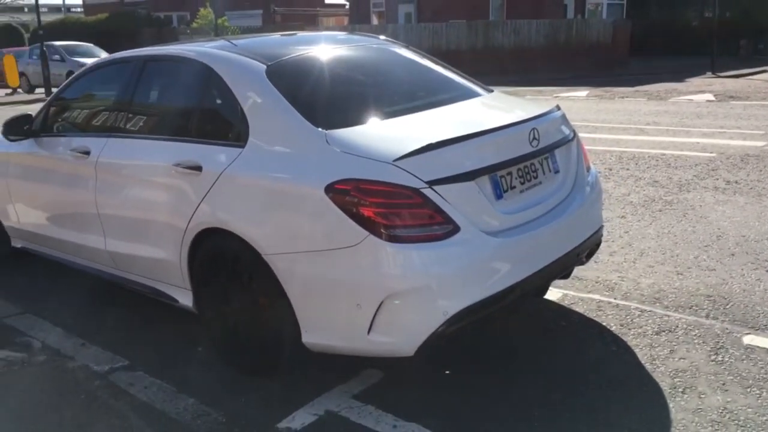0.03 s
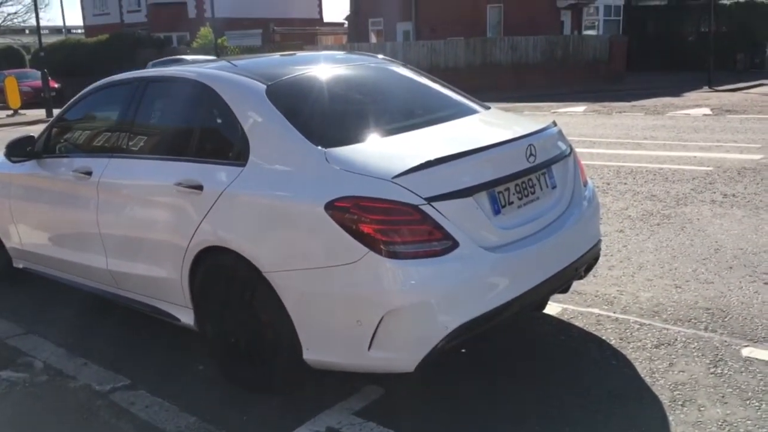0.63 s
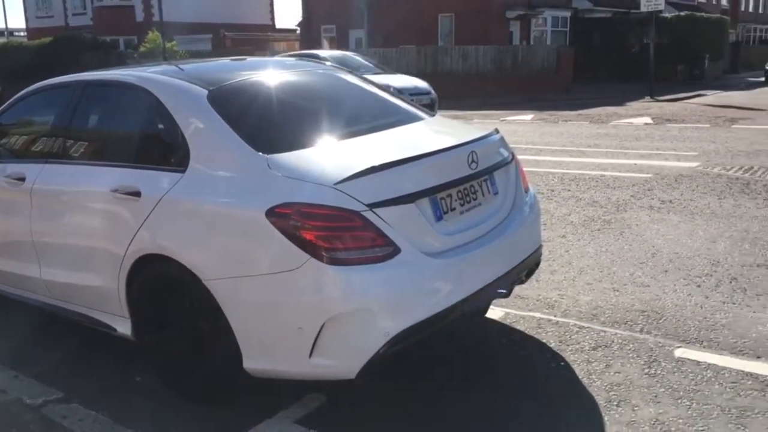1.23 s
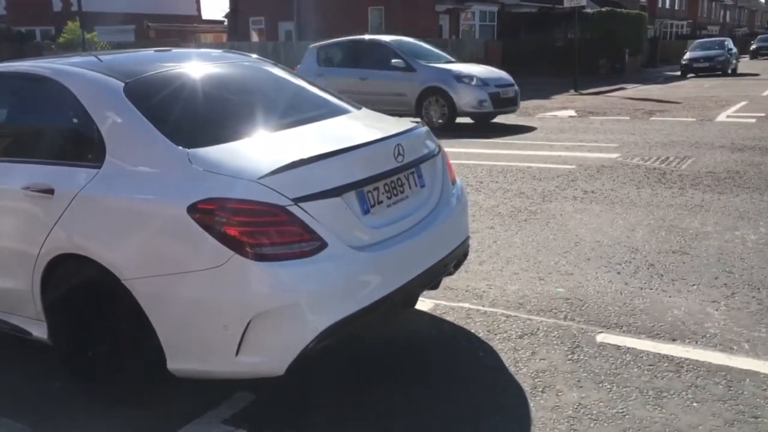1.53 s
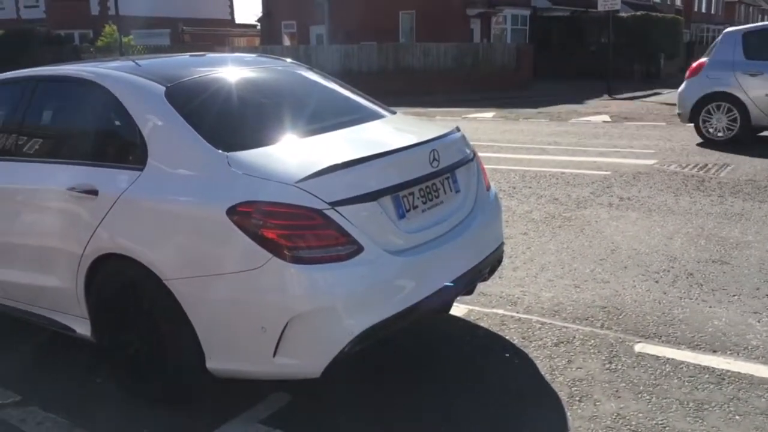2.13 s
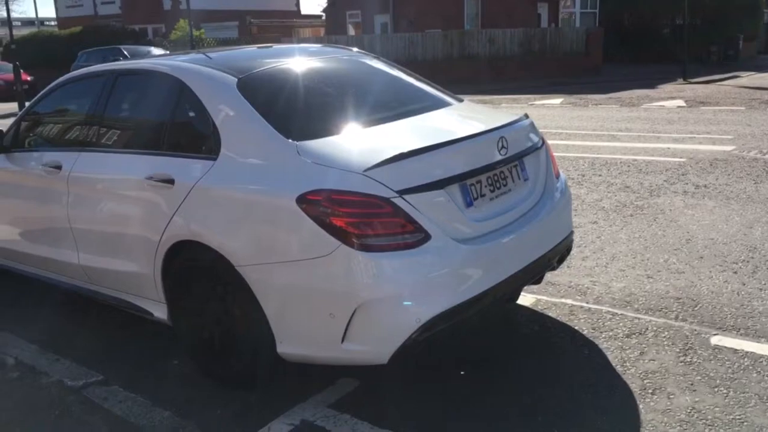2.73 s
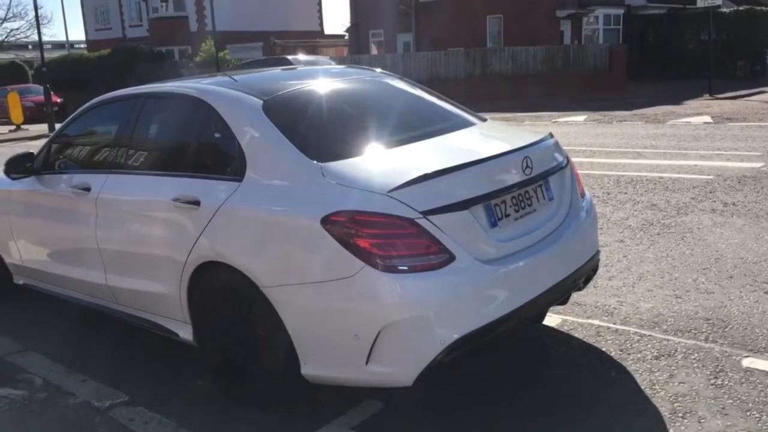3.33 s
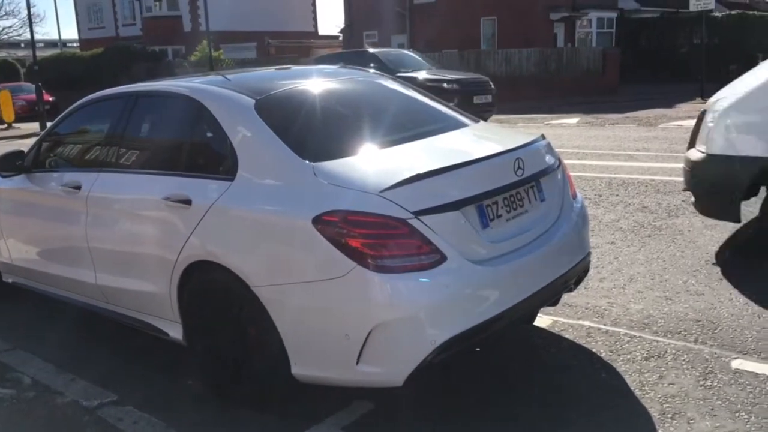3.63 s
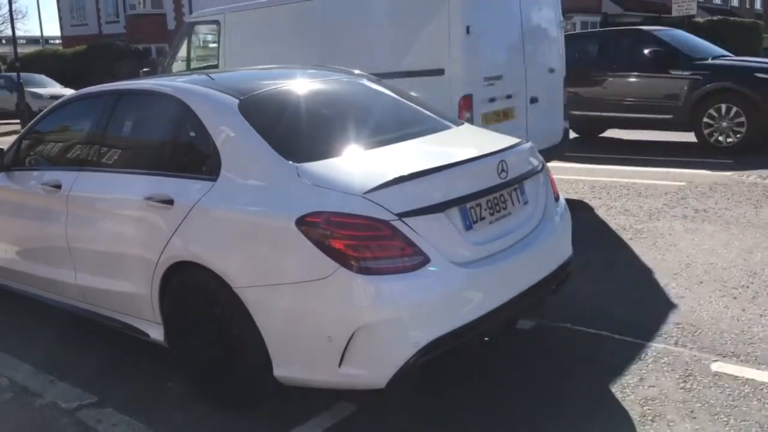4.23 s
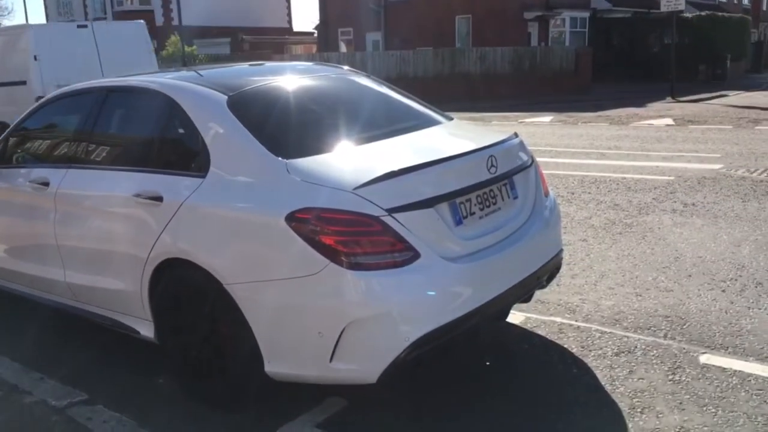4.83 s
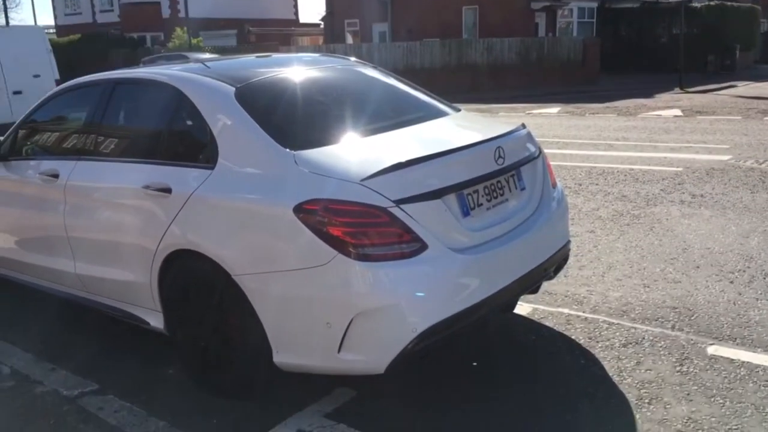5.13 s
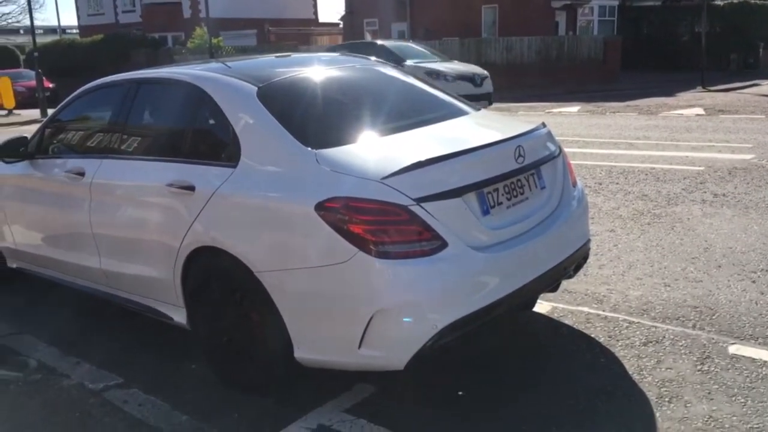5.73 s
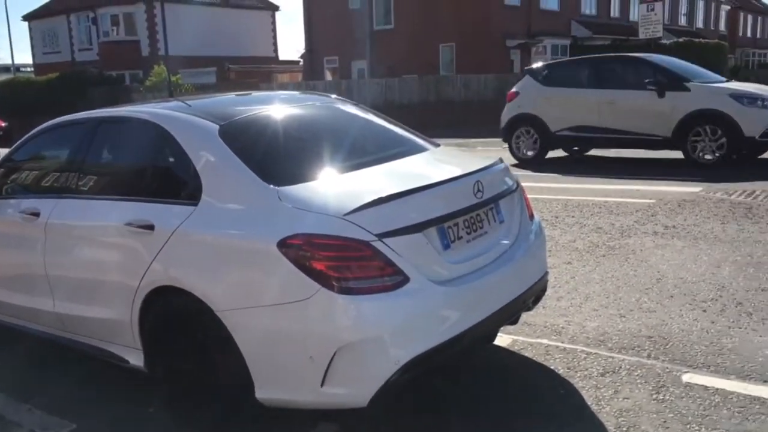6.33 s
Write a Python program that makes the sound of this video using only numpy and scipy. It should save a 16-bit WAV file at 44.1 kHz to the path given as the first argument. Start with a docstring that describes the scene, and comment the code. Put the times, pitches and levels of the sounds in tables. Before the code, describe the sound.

A V8 car stands at the kerb, heard from close behind its tailpipes. It revs at once, booming and rasping up to a peak at about 0.5 seconds, where the exhaust sputters and pops. The pitch then sinks to a low, burbling idle by 2.3 seconds. At 3 seconds a second rev climbs in three stabs, starting with a brief rattle of loose metal and a tiny high squeak. It peaks near 4 seconds with a quick cluster of sharp cracks, then winds down. A third, lower rev rises at 5.5 seconds, pops lightly near 5.9 and stays raised until the end at about 6.4. Very faint turbo whistles fall in pitch after each rev. Further off, cars and a van pass with soft swells of tyre noise around 0.5, 2, 3.6 and 6.2 seconds, over dull distant traffic.

```python
"""At the kerb of a street, one microphone behind the tailpipes of a standing turbocharged V8.
The engine is revved three times. Its orders boom through the silencers and each firing sends a rasp
of gas out of the pipes; at lift-off the exhaust sputters and unburnt fuel cracks, then the turbos
whistle faintly as they spin down. A loose exhaust part chatters as the second rev begins.
Further off, cars and a van roll past over a dull bed of distant traffic."""
import sys
import numpy as np
from scipy import signal
from scipy.io import wavfile
from scipy.ndimage import uniform_filter1d, minimum_filter1d, map_coordinates

SR = 44100
rng = np.random.default_rng(int(sys.argv[2]) if len(sys.argv) > 2 else 0)


def generate_wav(signal):
    """Clip the signal to [-1, 1] and save it as 16-bit WAV at the path in sys.argv[1]."""
    frames = np.transpose(np.atleast_2d(signal))
    scaled = np.clip(frames, -1, 1) * 32767
    pcm = np.round(scaled).astype(np.int16)
    wavfile.write(sys.argv[1], SR, pcm)


N = 282240
TIME = np.arange(N) / SR
BINS = np.fft.rfftfreq(8192, 1 / SR)

# tyre roar as it reaches the kerb: frequency_hz, gain_db
TYRE_SPECTRUM = [(25,-13),(60,12),(200,6.5),(400,-6.5),(600,-3.5),(1000,-2),(1600,-8),(2800,-13),(4000,-19),(4900,-24.5),(6200,-24.5),(8500,-31.5),(10500,-35.5),(15500,-38.5)]
# vehicles rolling past the microphone: nearest_s, half_length_s, level_db
PASS_BYS = [(0.43,0.35,-26),(2.123,0.29,-30),(3.592,0.19,-24.5),(6.2,0.5,-26.5)]
# their engine hum and gear whine: nearest_s, half_length_s, pitch_hz, level_db
PASSING_TONES = [(2.1,.14,340,-40),(2.08,.18,1470,-41.5),(2.75,.3,365,-42),(4.35,.4,43,-37)]
# turbos spinning down after each rev: start_s, end_s, first_pitch_hz, fall_hz_per_s, level_db
SPIN_DOWNS = [(.7,2.95,15780,3380,-70),(4.15,5.55,15680,3520,-74),(5.8,6.45,12050,1900,-71)]
# whistles within one spin-down: pitch_ratio, gain_db
WHISTLES = [(1, 3), (1.11, -1), (1.22, -3), (1.32, -4)]
# engine speed in four-stroke cycles a second: time_s, cycle_hz
ENGINE_SPEED = [(.07,20.3),(.2,37),(.4,45),(.48,46.3),(.8,40.3),(1.2,30.5),(1.8,16.7),(2.27,11.5),(2.7,10.25),
                (2.93,11),(3.38,28.4),(3.68,33.6),(3.8,45),(3.93,48.1),(4.01,43.7),(4.4,35.7),(4.76,31.5),(5.13,24.4),
                (5.48,22.5),(5.71,35.7),(5.9,33.1),(6.4,32.3)]
# throttle stabs, loads 0-1: start_s, rise_s, lift_off_s, full_load, load_left, fade_s, sputter_db, dip_db
THROTTLE_STABS = [(.01,0.2,.53,0.96,0.74,0.62,-2,-7), (2.95,0.074,3.10,0.75,0.49,1.1,-11,-4.5),
                  (3.22,0.073,3.37,.82,0.65,5.6,-11,-1), (3.62,0.11,4.0,1,0.64,0.21,-2.5,-5.5),
                  (4.85,.3,4.9,0.14,0.33,1.65,-5,-1.5), (5.41,0.33,5.865,0.95,0.46,1.56,-6,-6)]
# ring of the loose exhaust part: frequency_hz, gain_db
LOOSE_METAL = [(500,-3.5),(850,4.5),(1150,2.5),(1550,-5),(1900,-1),(2150,-2.5),(2350,-41),(4000,-30),(9000,-39)]
# broad colour of the exhaust rasp: frequency_hz, gain_db
RASP_SPECTRUM = [(150,-23.5),(400,-15.5),(490,-3.5),(700,-4.5),(830,2),(1030,1.5),(1600,-6),(2700,-12),(3200,-15.5),(4300,-23.5),(4900,-27),(6200,-25),(7500,-34.5),(9300,-30.5),(10500,-40.5),(15500,-37)]
# resonances of the pipe ends: centre_hz, width_hz, lift_db
PIPE_RESONANCES = [(530,25,4.5),(914,140,1),(1325,42,8),(1950,220,2.5),(2744,440,8.5),(3570,140,6),(4140,370,8.5)]
# unburnt fuel cracking in the pipes: time_s, peak_db, decay_s, tilt_db_per_octave
FUEL_CRACKS = [(.5194,-12,.003,0),(3.9765,-4,.005,-3),(3.9914,-1.5,.005,9),(4.0134,-13,.003,4),(5.8494,-14,.004,0)]
# multiples of the cycle rate that drone in the pipes: order, gain_db
DRONE_ORDERS = [(14, -8), (15, -3), (16, 0), (19, -8), (21, -8), (24, -9)]
# the low note; 8 is the firing rate, 3 and 5 the burble of the uneven banks: order, coast_db, load_db
ENGINE_ORDERS = [(1,-38,-38),(2,-11,-16),(3,0.5,-2),(4,-12.5,-20),(5,-3,-2.5),(6,-32,-4.5),(7,-20.5,-2.5),(8,-10,-1),(9,-11,-11.5),(10,-13,0),(11,-26,-10),(12,-22.5,-12),(13,-21.5,-3.5),(14,-15.5,2.5),(15,-31,-5),(16,-8,-4),(17,-42,-9),(18,-21,-23),(19,-23,-2),(20,-19.5,-10),(21,-27,-29),(22,-31,-1),(23,-30,8),(24,-16.5,6.5)]
# what the silencers let through: frequency_hz, gain_db
SILENCER_RESPONSE = [(20,-55),(35,-12),(52,6.5),(72,8),(105,3),(140,6.5),(190,2),(235,-3),(275,-10.5),(345,-12.5),(410,-31.5),(500,-11),(700,-29),(1200,-25.5),(5000,-80)]
# base level of the low note at each engine speed: cycle_hz, level_db
NOTE_LEVELS = [(10.2,-34.5),(11.6,-25),(19,-23.5),(25,-21.5),(32,-22.5),(36,-25.5),(40.5,-22.5),(47,-22.5)]
# brief booms of the silencers under load: time_s, half_length_s, lift_db
SILENCER_BOOMS = [(0.388,0.071,6),(3.05,0.058,3.5),(3.338,0.058,4),(3.76,0.1,4),(3.969,0.081,4),(5.8,0.15,5.5)]

HIGH_REV_HZ = 45  # cycle rate near the top of a rev; levels are set relative to it


def amp(db):
    """Decibels to gain."""
    return 10 ** (np.asarray(db) / 20)


def unit(x):
    """Scales to rms 1."""
    return x / np.sqrt(np.mean(x ** 2) + 1e-20)


def steady(x, size=5000):
    """Scales to a running rms of 1."""
    power = uniform_filter1d(uniform_filter1d(x ** 2, size), size // 2)
    return x / np.sqrt(abs(power) + 1e-12)


def curve_db(points, hz=BINS):
    """A curve in dB, interpolated over log frequency."""
    f, db = np.transpose(points)
    return np.interp(np.log(np.maximum(hz, 1)), np.log(f), db)


def colour(x, db):
    """Causal filter with the given gain at BINS."""
    log_gain = np.log(amp(np.r_[db, db[-2:0:-1]]))
    minimum_phase = np.exp(np.conj(signal.hilbert(log_gain)))
    taps = np.fft.ifft(minimum_phase).real
    return signal.oaconvolve(x, taps[:len(taps) // 2])[:len(x)]


def wander(hz):
    """Smooth random drift of rms near 1, moving at up to about hz."""
    knots = rng.standard_normal(2048)
    return map_coordinates(knots, [TIME[::64] * 2 * hz], order=3, mode="wrap").repeat(64)[:N]


def bump(s, half_s):
    """A smooth swell of height 1 around a moment."""
    return np.exp(-((TIME - s) / half_s) ** 2)


def rise(s, length_s):
    """A ramp from 0 to 1 that starts at a moment."""
    return np.clip((TIME - s) / length_s, 0, 1)


def fade(s, decay_s):
    """Holds 1 until a moment, then dies away."""
    return np.exp(-np.maximum(TIME - s, 0) / decay_s)


def sine(hz):
    """A tone that follows a moving pitch."""
    return np.sin(2 * np.pi * np.cumsum(hz) / SR)


def pulses(at, sizes):
    """A train of clicks."""
    train = np.zeros(N)
    train[at] = sizes
    return train


def tails(train, decay_s):
    """Gives each click an exponential tail."""
    return signal.lfilter([1], [1, -np.exp(-1 / (decay_s * SR))], train)


def traffic(far_db=-37, far_db_per_octave=-3.5, flicker_db=.46):
    """Tyre roar swells and fades with each vehicle's distance, over far traffic dulled by its range."""
    tyres_db = curve_db(TYRE_SPECTRUM)
    treble_octaves = np.log2(np.maximum(BINS / 2000, 1))
    roar = unit(colour(rng.standard_normal(N), tyres_db))
    far = unit(colour(rng.standard_normal(N), tyres_db + far_db_per_octave * treble_octaves))
    near_power = sum(amp(db) ** 2 / (1 + ((TIME - s) / half_s) ** 2) for s, half_s, db in PASS_BYS)
    return (np.sqrt(near_power) * roar + amp(far_db) * far) * amp(flicker_db * wander(8))


def passing_tones(doppler=.05, waver=.025):
    """Each hum or whine swells and drops in pitch as its vehicle passes the microphone."""
    out = np.zeros(N)
    for s, half_s, hz, db in PASSING_TONES:
        pitch_hz = hz * (1 - doppler * np.tanh((TIME - s) / half_s) + waver * wander(60))
        out += amp(db) * bump(s, half_s) * sine(pitch_hz)
    return out


def street_echoes(x, wet_db=-11, t60_s=.2, echoes_per_s=1500):
    """Adds scattered echoes from the road, cars and house fronts."""
    t = TIME[:SR // 2]
    taps = rng.standard_normal(len(t)) * (rng.random(len(t)) < echoes_per_s / SR)
    taps *= (t > .004) * amp(-60 * t / t60_s)
    return x + amp(wet_db) * signal.oaconvolve(x, taps / np.linalg.norm(taps))[:N]


def turbos(flutter_db=4.5):
    """The turbos coast down with a few thin whistles that fade in and out."""
    out = np.zeros(N)
    for start, end, first_hz, fall, db in SPIN_DOWNS:
        hz = first_hz - fall * (np.clip(TIME, start, end) - start)
        spinning = uniform_filter1d(1. * ((TIME > start) & (TIME < end)), size=3000)
        for ratio, gain_db in WHISTLES:
            whistle = sine(ratio * hz + 20 * wander(60))
            out += spinning * amp(db + gain_db + flutter_db * wander(20)) * whistle
    return out


def idling(cycle_hz, idle_hz=11.9, range_hz=7.9):
    """1 at idle, 0 well above it."""
    return np.exp(-((cycle_hz - idle_hz) / range_hz) ** 2)


def engine_load(cycle_hz, drop_s=.055, idle_load=.39):
    """Each stab rises, holds, drops at lift-off and trails away; the governor holds some load at idle."""
    load = np.zeros(N)
    for start, rise_s, lift, full, left, fade_s, _, _ in THROTTLE_STABS:
        stab = (full - left) * fade(lift, drop_s) + left * fade(lift, fade_s)
        load += rise(start, rise_s) * (stab - load)
    return np.clip(np.maximum(load, idle_load * idling(cycle_hz)), 0, 1)


def firings(cycles):
    """Sample and cylinder of each of the eight firings in every cycle."""
    count = np.floor(cycles * 8).astype(int)
    at = np.flatnonzero(np.diff(count)) + 1
    return at, count[at] % 8


def lift_dip_db(after_s=.085, half_s=.036):
    """The exhaust falls away briefly after each lift-off."""
    return sum(db * bump(lift + after_s, half_s) for _, _, lift, *_, db in THROTTLE_STABS)


def gas_blast(cycle_hz, load, base_db=-19, load_db=22.5, db_per_octave=3, dip_share=.43):
    """Gain of the rasp and drone: gas leaves the tailpipes harder with load and with speed."""
    speed_db = db_per_octave * np.log2(cycle_hz / HIGH_REV_HZ)
    return amp(base_db + load_db * (load - 1) + speed_db + dip_share * lift_dip_db())


def tailpipe_db():
    """Response of the pipe ends: a broad slope with a few resonances."""
    peaks_db = sum(db / (1 + (2 * (BINS - hz) / width) ** 2) for hz, width, db in PIPE_RESONANCES)
    return curve_db(RASP_SPECTRUM) + peaks_db


def squeak(time_s=3.35, pitch_hz=4400, level_db=-38, half_s=.026):
    """One short, high squeak as the revs climb."""
    return amp(level_db) * bump(time_s, half_s) * sine(pitch_hz + 50 * wander(120))


def chatter(cycles, start_s=2.99, end_s=3.29, level_db=-27, ring_s=.0069, uneven=.51):
    """Firings shake a loose, thin metal part of the exhaust as the engine pulls from low speed."""
    at, _ = firings(cycles)
    knocks = pulses(at, np.exp(uneven * rng.standard_normal(N)[at]))
    bursts = tails(knocks, ring_s) * rng.standard_normal(N)
    rattle = steady(colour(bursts, curve_db(LOOSE_METAL)))
    shaking = rise(start_s, length_s=.042) * fade(end_s, decay_s=.086)
    return amp(level_db) * shaking * rattle


def cracks(top_hz=6800):
    """Short bursts of burning fuel ring the tailpipes."""
    out = np.zeros(N)
    t = TIME[:len(BINS)]
    pipe_db = tailpipe_db() - 10 * np.log10(1 + (BINS / top_hz) ** 14)
    octaves = np.log2(np.clip(BINS, 300, 6000) / 1000)
    for s, db, decay_s, tilt in FUEL_CRACKS:
        burst = colour(rng.standard_normal(len(t)) * np.exp(-t / decay_s), pipe_db + tilt * octaves)
        out[round(s * SR):][:len(t)] += amp(db) * burst / abs(burst).max()
    return out


def drone(cycles, cycle_hz, load, gain_db=-2.5, pipe_hz=505, width_hz=100, waver=.3):
    """Higher orders sing out in turn as they cross the lowest pipe resonance, most at part load."""
    note = np.zeros(N)
    for order, db in DRONE_ORDERS:
        ring = 1 / np.sqrt(1 + (2 * (order * cycle_hz - pipe_hz) / width_hz) ** 2)
        swell = 1 + waver * wander(16)
        note += amp(db) * ring * swell * np.cos(2 * np.pi * (order * cycles + rng.random()))
    part_load = np.exp(-((load - .49) / .4) ** 2)
    return amp(gain_db) * np.sqrt(2) * part_load * note


def sputter(cycles, cycle_hz, floor_db=-33, idle_db=-10.5, after_s=.03, half_s=.025):
    """Uneven burning, heard through the silencers at idle and for a moment at each lift-off."""
    at, _ = firings(cycles)
    pops = colour(pulses(at, rng.standard_normal(N)[at]), curve_db(SILENCER_RESPONSE))
    lifts = sum(amp(db) * bump(lift + after_s, half_s) for _, _, lift, *_, db, _ in THROTTLE_STABS)
    return (amp(floor_db) + amp(idle_db) * idling(cycle_hz) + lifts) * steady(pops)


def rasp(cycles, load, uneven=.096, front_db=3, front_top_hz=1700,
         puff_db=6, puff_s=.0034, puff_top_hz=6000, hiss_db=-23, edge_hz=1050):
    """Each firing sends a sharp pressure front and a puff of turbulent gas out of the pipes."""
    at, cylinder = firings(cycles)
    near_bank = np.array([1, 0, 0, 1, 0, 1, 1, 0])  # a cross-plane crank fires each bank unevenly
    sizes = (.66 + near_bank[cylinder]) * np.exp(uneven * load[at] * rng.standard_normal(N)[at])
    train = pulses(at, sizes)
    pipe_db = tailpipe_db()
    fronts = colour(train, pipe_db - 10 * np.log10(1 + (BINS / front_top_hz) ** 4))
    flow = .25 + unit(tails(train, puff_s))
    puff_band = 1 / (1 + (BINS / puff_top_hz) ** 6)
    puffs = colour(flow * rng.standard_normal(N), pipe_db + 10 * np.log10(puff_band))
    # the finest eddies hiss on between the firings
    hiss = colour(rng.standard_normal(N), pipe_db + 10 * np.log10(1.0001 - puff_band))
    gas = amp(front_db) * steady(fronts) + amp(puff_db + 3 * load) * steady(puffs)
    gas = steady(gas) + amp(hiss_db) * unit(hiss)
    # under load the fronts steepen: the treble opens up to a hard edge
    treble = signal.sosfiltfilt(signal.butter(2, edge_hz, "high", fs=SR, output="sos"), gas)
    treble_db = -12 + 8 * load
    return steady(gas + (amp(treble_db) - 1) * treble)


def fifth_order_db(cycle_hz, load, boom_db, db_per_octave=3.5, held_db=10, held_hz_per_s=11.03):
    """The fifth order grows with speed, drones at held revs on a light throttle, gives way in a boom."""
    change_hz_per_s = abs(uniform_filter1d(np.gradient(cycle_hz) * SR, size=6000))
    held = np.exp(-change_hz_per_s / held_hz_per_s) * (1 - load ** 2)
    return db_per_octave * np.log2(cycle_hz / HIGH_REV_HZ) + held_db * held - 1.04 * boom_db


def note_levels(cycle_hz, load, lag_s=.2, pressure_db=8, third_lag_db=-10.5):
    """Low note level and burble order lifts in dB; the note grows as exhaust pressure trails the load."""
    keep = np.exp(-1 / (lag_s * SR))
    pressure = signal.lfilter([1 - keep], [1, -keep], load)
    boom_db = sum(db * bump(s, half_s) for s, half_s, db in SILENCER_BOOMS)
    level_db = curve_db(NOTE_LEVELS, cycle_hz) + pressure_db * pressure + boom_db + lift_dip_db()
    # the third order is weak until the pressure catches up
    third_db = third_lag_db * np.maximum(load - pressure, 0) * load * amp(-boom_db)
    return level_db, {3: third_db, 5: fifth_order_db(cycle_hz, load, boom_db)}


def low_note(cycles, cycle_hz, load, fill_per_octave=.37, burble_waver=.12, other_waver=.27):
    """Engine orders boom through the silencers; load fills in the weak ones, more so at low speed."""
    level_db, burble_db = note_levels(cycle_hz, load)
    fill = np.clip(load * (1 + fill_per_octave * np.log2(HIGH_REV_HZ / cycle_hz)), 0, 1)
    note = np.zeros(N)
    for order, coast_db, load_db in ENGINE_ORDERS:
        db = coast_db + fill * (load_db - coast_db) + burble_db.get(order, 0)
        db += curve_db(SILENCER_RESPONSE, order * cycle_hz)
        swell = 1 + (burble_waver if order in burble_db else other_waver) * wander(9)
        note += amp(db) * swell * np.cos(2 * np.pi * (order * cycles + rng.random()))
    return amp(level_db) * steady(steady(note) + sputter(cycles, cycle_hz))


def scene():
    """Mono, behind the pipes: one crankshaft drives note, drone, rasp and chatter, with traffic beyond."""
    cycle_hz = np.interp(TIME, *np.transpose(ENGINE_SPEED)) * (1 + .001 * wander(15))
    cycles = np.cumsum(cycle_hz) / SR
    load = engine_load(cycle_hz)
    blast = gas_blast(cycle_hz, load)
    tones = low_note(cycles, cycle_hz, load) + blast * drone(cycles, cycle_hz, load)
    harsh = street_echoes(blast * rasp(cycles, load) + chatter(cycles) + squeak() + cracks())
    return (tones + harsh + turbos() + traffic() + passing_tones())[None]


def record(dry, ceiling=.6, top_hz=15700):
    """After the microphone, a fast limiter holds down the peaks and a low-pass cuts the top treble."""
    allowed = np.minimum(1, ceiling / (abs(dry) + 1e-9))
    limited = dry * uniform_filter1d(minimum_filter1d(allowed, size=200), size=200)
    low_pass = signal.firwin(2047, top_hz, window=("kaiser", 9), fs=SR)
    return signal.oaconvolve(limited, low_pass[None], "same")


dry = scene()
out = record(dry)
generate_wav(out)
```